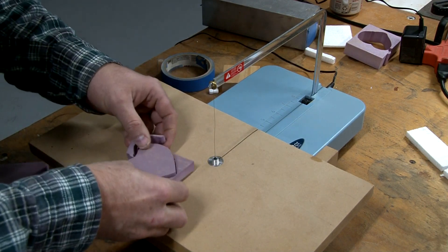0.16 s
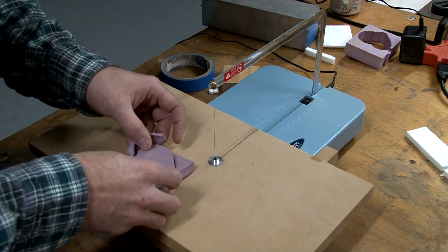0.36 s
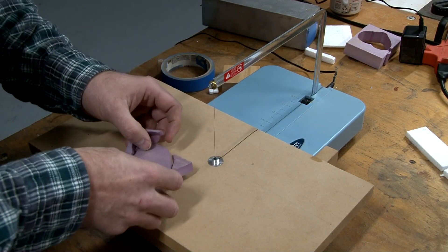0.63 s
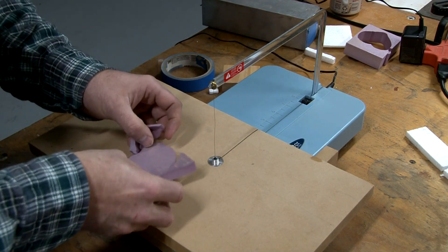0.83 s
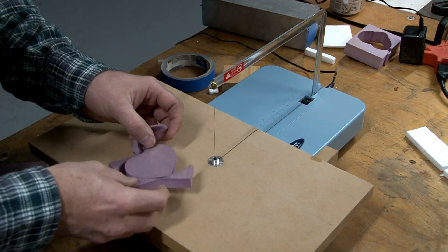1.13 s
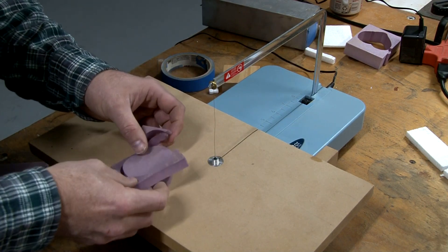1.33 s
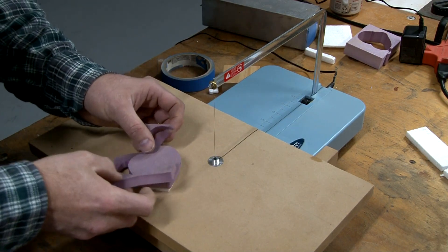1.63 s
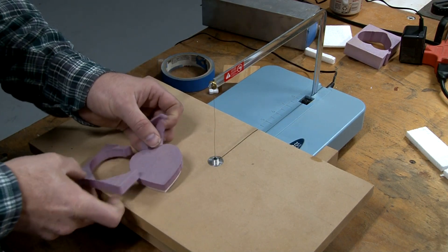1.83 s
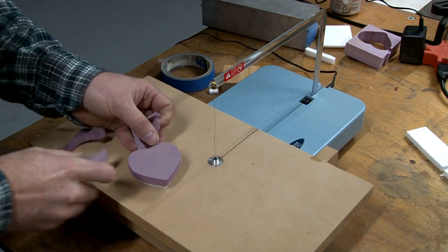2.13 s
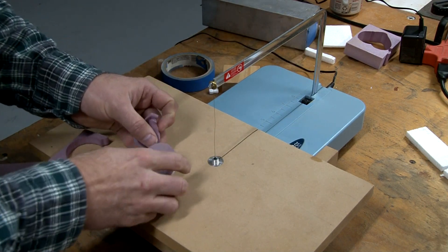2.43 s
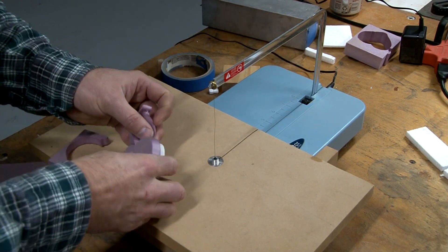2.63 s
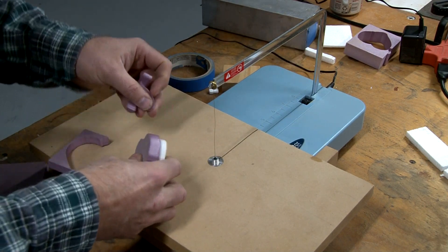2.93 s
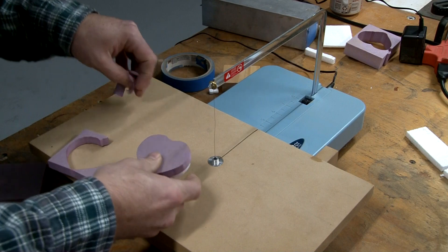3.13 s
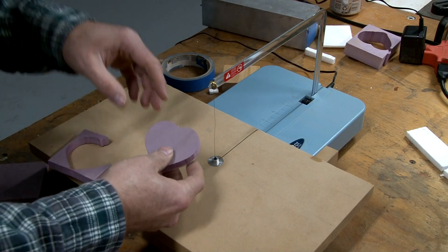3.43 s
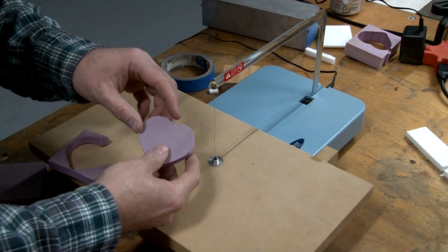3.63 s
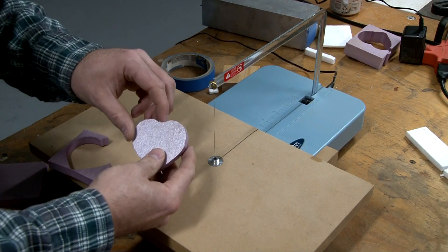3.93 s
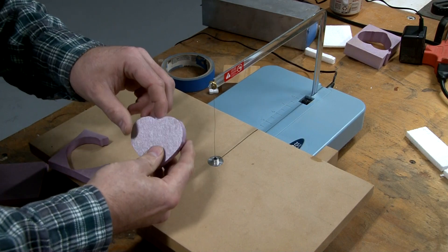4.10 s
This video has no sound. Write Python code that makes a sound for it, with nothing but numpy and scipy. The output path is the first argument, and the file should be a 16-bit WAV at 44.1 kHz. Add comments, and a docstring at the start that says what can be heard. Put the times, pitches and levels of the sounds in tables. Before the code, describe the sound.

Close, dry handling of rigid foam at a workshop bench, over very quiet steady air noise in a small room with short, sparse reflections. From the start, gritty, hollow, squeaky rubs come in short uneven strokes, with a sharp loud crack at 0.2 s and more crisp snaps around 0.75 s. Light hollow knocks on the board fall at 0.9, 1.2 and 1.3 s, amid firmer scrapes; another bright snap comes at 1.5 s, then a high brushing scrape and fingertip fizz until 1.9 s. Between 2.05 and 2.2 s cracks mix with a short thin metal ping. More snaps and rubs follow, with a dull bump and double crack near 2.75 s. A scrap hits sheet metal at 3.2 s, clattering brightly with rattle and ring around 3.4-3.5 s. As it fades, a crisp tick at 3.8 s, a firm scrape at 3.9 s and faint final touches remain.

```python
"""Cutting rigid foam by hand

A shape is worked out of a foam block on a workshop bench: uneven ticks scrape in strokes, fingertips fizz,
and caught edges snap loose as a slip and a crumble. Pieces knock on the board (noise puffs and modes),
thin metal pings and a tossed scrap clatters on sheet metal (modes over rattle).
Steady filtered noise lies beneath; sparse decaying reflections make a small room.
"""
import sys
import numpy as np
from scipy import signal
from scipy.fft import rfft, irfft
from scipy.io import wavfile

SR = 44100
rng = np.random.default_rng(int(sys.argv[2]) if len(sys.argv) > 2 else 0)


def dump_mix(stems):
    """Bounce the given channels to the path in sys.argv[1] as a 16-bit WAV at rate SR."""
    frames = np.atleast_2d(stems).T  # one column per channel
    limited = np.clip(frames, -1, 1)  # hard clip at full scale
    pcm = np.round(limited * 32767).astype(np.int16)
    wavfile.write(sys.argv[1], SR, pcm)


N = 188042
TIME_S = np.arange(N) / SR

# Workshop noise spectrum. Each row: frequency in Hz, relative level in dB.
AIR_SPECTRUM = [(15, -55), (35, -12), (70, -7.5), (110, 0), (170, -6), (285, -8), (416, 1), (680, -9),
                (1100, -5), (2000, -5.5), (3000, -9.5), (3600, -9.5), (6500, -7.5), (10000, -19),
                (16000, -42)]
AIR_DB = -65.5

# Room decay. Each row: frequency in Hz, t60 in seconds.
ROOM_DECAY = [(150, 0.2), (600, 0.47), (2000, 0.85), (6500, 0.46), (10000, 0.24), (15000, 0.024)]

# Scrap hitting sheet metal. Each row: start in seconds, level in dB, brightness in dB per octave
# about 3 kHz, loose rattle in dB against the hit level.
CLINKS = [(3.2147, -51.5, -1.5, -4.5), (3.3803, -46.5, 6.5, -1.5), (3.385, -48, 10.5, -11),
          (3.4945, -56, -3, 3), (3.503, -49, 2.5, -3)]
# Touches on the thin metal part. Each row: as for the clinks.
PINGS = [(2.0543, -51.5, 9, -13), (2.2015, -39, 7, -11.5)]
# Modes of the sheet metal. Each row: frequency in Hz, level in dB before brightness, t60 in seconds.
SHEET_METAL_MODES = [(420, -12, .4), (1045, -8, 0.35), (1440, -1.5, 0.94), (3034, -2, 0.77),
                     (3860, -10, 0.21), (4270, -24, .17), (5230, -6, 0.53), (6524, -7.5, .3),
                     (6504, -6.5, 0.52), (6900, -25, 0.33), (9050, -11, 0.12), (9220, -34, .5),
                     (9400, -33, 0.41)]
# Modes of the thin metal part. Each row: as for the sheet metal.
THIN_METAL_MODES = [(2475, 3, 0.097), (2490, -20, .4), (2570, -10, 0.24), (2850, -10, 0.29)]
# Spectrum of the loose rattle. Each row: frequency in Hz, relative level in dB.
RATTLE_SPECTRUM = [(200, -37), (500, -0.5), (1200, 2.5), (3000, 7.5), (4700, 0), (6500, -0.5), (8000, -4),
                   (9300, -8), (10500, -12), (16000, -42)]

# Soft bumps on the bench. Each row: start in seconds, level in dB.
BUMPS = [(1.877, -60), (2.762, -45.5)]
# Spectrum of a bench bump. Each row: frequency in Hz, relative level in dB.
BENCH_SPECTRUM = [(20, -41), (50, -7), (100, 0), (150, 0), (225, 0), (290, -9), (385, -2), (520, -12),
                  (2000, -59)]
# Pieces knocking on the board. Each row: start in seconds, level in dB, noise decay constant in seconds,
# gain of the board ring in dB.
KNOCKS = [(0.8807, -35.5, 0.0093, -67), (1.1805, -39.5, 0.01, -63), (1.297, -33.5, 0.001, -84),
          (2.0536, -49.5, 0.0079, -65.5), (2.2012, -49.5, 0.003, -76), (2.488, -52.5, 0.019, -58),
          (2.8193, -48, 0.0013, -91), (3.373, -39.5, 0.0073, -65), (3.383, -42.5, 0.0052, -81)]
# Spectrum of a knock. Each row: frequency in Hz, relative level in dB.
BOARD_SPECTRUM = [(30, -57), (120, -23), (280, -19), (430, -5), (700, -1.5), (1150, 6.5), (1800, -1.5),
                  (3000, -2.5), (8000, -22)]
# Modes of the board. Each row: frequency in Hz, relative level in dB, t60 in seconds.
BOARD_MODES = [(440, 6.2, 0.061), (595, 1.6, 0.3), (826, 1.5, 0.085), (1041, 3.7, 0.13)]

# Fingertips sliding over open cells. Each row: start in seconds, length in seconds, peak level in dB.
FINGER_SLIDES = [(0.072, .06, -49), (0.612, 0.025, -52), (1.69, 0.13, -52), (1.786, 0.14, -52.5),
                 (2.974, 0.081, -68), (3.082, 0.084, -53), (3.16, 0.024, -56.5)]

# Foam catching and letting go. Each row: start in seconds, ring level in dB, flex of the piece in dB
# against the ring, sharp edge in dB against the ring, crumble decay constant in seconds.
SNAPS = [(0.1006, -28.5, -3, -1, 0.0004), (0.2211, -10, -18, -17, 0.00065), (.347, -36, -3.5, -4, .001),
         (0.3593, -34.5, -6, -0.5, 0.0011), (0.6142, -35.5, -20, -1, 0.00065),
         (0.7192, -39, -17, -2, .0012), (0.7406, -26, -21, -16, 0.0043), (0.7705, -27, -20, -10, 0.0033),
         (.937, -35, 2.5, -1.5, 0.0011), (0.9447, -40, 12.5, -4, 0.00081), (0.9543, -32, 0, -11, 0.0024),
         (1.1182, -39, -14, -18, .0005), (1.3213, -31.5, -7, -6.5, 0.00096),
         (1.4627, -38.5, -0.5, -22, 0.00079), (1.488, -22.5, -7.5, -8.5, 0.00063),
         (1.8594, -31.5, -14, -6, .0008), (2.054, -30, -9, -6.5, 0.0019), (2.1162, -23, -8, -8.5, 0.0011),
         (2.161, -36.5, -3.5, -6, 0.0019), (2.2015, -30.5, 4, -11, 0.0011), (2.3342, -40, -4, -2.5, 0.0012),
         (2.4038, -26.5, -24, -2, .0016), (2.568, -43, 6.5, 4, 0.00099), (2.59, -39, 7.5, 4, 0.0017),
         (2.652, -39.5, 4, 1, 0.0026), (2.7484, -22, -9, -9.5, 0.0041), (2.7525, -24.5, -11, -3, 0.0011),
         (2.8229, -31.5, 1, -6, 0.001), (3.2147, -32.5, 2.5, -7.5, 0.0011), (3.231, -38.5, -37, -4, .0009),
         (3.7786, -25, -12, 0, 0.00084), (4.147, -44, 2, -11, 0.0011), (4.213, -42, -1, -10, 0.013)]
# Spectrum of the flexing piece. Each row: frequency in Hz, relative level in dB.
FLEX_SPECTRUM = [(50, -56), (300, -7), (1000, -14.5), (1800, -2.5), (2450, 14), (3400, 12.5), (4100, -37),
                 (4900, 14.5), (7000, -49)]
# Spectrum of the sharp edge and the fingertips. Each row: frequency in Hz, relative level in dB.
EDGE_SPECTRUM = [(500, -36), (4000, -28), (8500, 1), (11000, 7.5), (13000, 5), (16000, -3.5)]
# The more the piece flexes, the lower its ring.
SNAP_HZ, SNAP_HZ_PER_FLEX_DB = 6040, -34

# Light rubbing between strokes. Each row: time in seconds, level in dB before the grit and body shares.
LIGHT_RUB = [(0.0, -44), (.24, -53.5), (.5, -53), (.68, -55.5), (.8, -45), (1.0, -59.5), (1.2, -48.5),
             (1.42, -56.5), (1.68, -47), (1.96, -54.5), (2.15, -52), (2.29, -67), (2.43, -47.5),
             (2.55, -58.5), (2.76, -55), (2.93, -66), (3.55, -65), (4.26, -68)]
# Firm strokes. Each row: start in seconds, length in seconds, place of the peak from 0 to 1, grit level in dB,
# hollowness (body against grit) in dB, contact resonance in Hz.
STROKES = [(0.01, 0.1, 0.53, -46, -8, 2580), (0.155, 0.021, .4, -44.5, -4, 2500),
           (0.277, 0.0089, 0.7, -47, -4, 4500), (0.336, 0.08, 0.23, -47, -8, 5670),
           (0.43, 0.082, 0.26, -49.5, -2.5, 4900), (0.572, 0.059, 0.95, -51, -4, 5600),
           (0.727, 0.074, 0.17, -45, -1, 3780), (.855, .04, 0.68, -40, -4, 4110),
           (0.902, 0.17, .15, -56.5, 0.5, 1390), (1.18, 0.0091, 0, -41.5, 0.5, 2230),
           (1.212, 0.11, 0.41, -38.5, -6.5, 3820), (1.482, .13, 0.02, -47, -4.5, 4180),
           (1.61, 0.2, 0.85, -41.5, -12, 7000), (1.797, 0.13, 0.48, -48, -2.5, 6860),
           (2.339, 0.054, 1, -56.5, 4, 5640), (2.383, 0.041, 0.4, -40, -9, 4330),
           (2.576, 0.041, .7, -47, -8, 3920), (2.704, 0.063, 0.92, -45, -7, 6240),
           (2.98, 0.12, 0.16, -60, -17, 6260), (3.048, 0.082, 1, -49.5, -17.5, 2480),
           (3.72, 0.037, 1, -57, 1.5, 1550), (3.899, 0.081, 0.06, -35, -11, 1366),
           (3.962, 0.042, 0.5, -43.5, -4, 1190), (4.056, 0.064, 0.27, -55, -0.5, 5800)]
# Spectrum of the gritty scrape. Each row: frequency in Hz, relative level in dB.
GRIT_SPECTRUM = [(80, -77), (500, -55), (1200, -38.5), (1900, -20), (2500, -3), (3300, -17), (4100, -2.5),
                 (4800, -11.5), (5800, -3), (7000, -0.5), (7900, -6.5), (9700, -12.5), (10900, -8),
                 (13200, -19.5), (15000, -22)]
# Spectrum of the hollow body. Each row: frequency in Hz, relative level in dB.
BODY_SPECTRUM = [(60, -48), (250, -31.5), (430, -10.5), (750, -7), (1250, -1), (1900, -3), (2600, -2),
                 (3300, 4), (4000, -8), (4800, -4.5), (9000, -26.5)]
WALL_DB = 2.74  # foam wall under the contact, against the stroke's hollow body

# Microphone colour with a narrow dip. Each row: frequency in Hz, gain in dB.
MICROPHONE = [(3100, -1.5), (3480, -9), (3850, 1)]
# Stereo lean. Each row: frequency in Hz, left minus right in dB.
LEAN = [(100, 2.5), (280, 3.5), (550, 1.5), (1100, 0.1), (2200, 0.8), (4500, 1.9), (9000, 0)]
CUT_HZ = 16100


def amp(db):
    """Decibels to gain."""
    return 10 ** (np.asarray(db) / 20)


def unit(x):
    """Scales to rms 1."""
    return x / np.sqrt(np.mean(x ** 2) + 1e-20)


def read(points, hz):
    """Reads a table along a log-frequency axis."""
    f, value = np.transpose(points)
    return np.interp(np.log(hz + 1), np.log(f + 1), value)


def add(mix, s, sound):
    """Mixes a sound in at a time."""
    part = mix[max(round(s * SR), 0):][:len(sound)]
    part += sound[:len(part)]


def colour(x, spectrum, size=4096):
    """Causal filter with the given spectrum: it rings after a click, never before."""
    log_gain = np.log(amp(read(spectrum, abs(np.fft.fftfreq(size, 1 / SR)))))
    response = np.fft.ifft(np.exp(np.conj(signal.hilbert(log_gain)))).real
    return signal.fftconvolve(x, response[:size // 2])[:len(x)]


def wander(rate_hz):
    """Smooth chance of rms 1, rolled off above a rate."""
    hz = np.fft.rfftfreq(N, 1 / SR)
    return unit(irfft(rfft(rng.standard_normal(N)) / (1 + (hz / rate_hz) ** 2), N))


def burst(decay_s, size=4096):
    """A puff of noise that dies away."""
    return rng.standard_normal(size) * np.exp(-np.arange(size) / SR / decay_s)


def packed(x, length_s):
    """Scales a short sound to the energy of rms 1 held for a length."""
    return x / np.sqrt(np.sum(x ** 2) / (length_s * SR) + 1e-20)


def air(apart=0.63):
    """Steady workshop noise: a shared middle plus independent sides."""
    middle, left, right = (unit(colour(rng.standard_normal(N), AIR_SPECTRUM)) for _ in range(3))
    return amp(AIR_DB) * unit(middle + apart * np.array([left, right]))


def room(x, gap_s=0.0014, apart=0.93, order=12):
    """Sparse reflections of random sign for each side, each band dying at its own speed."""
    signs = rng.choice([-1., 1.], (2, SR))
    present = rng.random((2, SR)) < 1 / order
    taps = signs * present * (np.arange(SR) / SR > gap_s)
    # close-set microphones share most reflections
    taps = taps[0] + apart * np.array([[.7], [-.7]]) * taps[1]
    hz, t_s, bands = signal.stft(taps, SR, nperseg=256)
    decay = amp(-60 * t_s / read(ROOM_DECAY, hz)[:, None])
    tail = signal.istft(bands * decay, SR, nperseg=256)[1]
    return signal.fftconvolve(x[None], tail / np.linalg.norm(tail[0]), axes=1)[:, :N]


def metal(hits, modes, crash_db, crash_s, rattle_t60_s, contact_s, chatter_db=3, low_edge_hz=550):
    """Each hit rings the modes, loudest in the first moments, over an uneven rattle."""
    out, t_s = np.zeros(N), np.arange(SR) / SR
    press = 1 - np.exp(-t_s / contact_s)  # foam is a soft striker
    crash = (1 + amp(crash_db) * np.exp(-t_s / crash_s)) / 2
    for start_s, db, bright_db_per_octave, rattle_db in hits:
        ring = np.zeros(SR)
        for hz, mode_db, t60_s in modes:
            bright_db = bright_db_per_octave * np.log2(hz / 3000)
            ring += amp(mode_db + bright_db - 60 * t_s / t60_s) * np.sin(2 * np.pi * hz * t_s)
        chatter = rng.standard_normal(SR) * amp(chatter_db * wander(110)[:SR])
        rattle = unit(colour(chatter, RATTLE_SPECTRUM)) * amp(rattle_db - 60 * t_s / rattle_t60_s)
        add(out, start_s, amp(db) * press * (ring * crash + rattle))
    # the clinks and pings carry no low thump
    return signal.lfilter(*signal.butter(2, low_edge_hz, "high", fs=SR), out)


def knocks(bump_s=0.0025, rebound=0.2, rebound_s=0.0042):
    """Light hollow knocks ring the board; dull bumps push the bench and rebound once."""
    out, t_s = np.zeros(N), np.arange(SR // 2) / SR
    ring = sum(amp(db - 60 * t_s / t60_s) * np.sin(2 * np.pi * hz * t_s) for hz, db, t60_s in BOARD_MODES)
    for start_s, db, decay_s, ring_db in KNOCKS:
        knock = packed(colour(burst(decay_s), BOARD_SPECTRUM), decay_s)
        add(out, start_s, amp(db) * knock)
        add(out, start_s, amp(ring_db) * ring)
    thud = packed(colour(signal.unit_impulse(len(t_s)), BENCH_SPECTRUM), bump_s)
    for start_s, db in BUMPS:
        add(out, start_s, amp(db) * thud)
        add(out, start_s + rebound_s, amp(db) * rebound * thud)
    return out


def fingertips(uneven_db=4):
    """Dry skin ticks over the smallest cells: a thin, high fizz."""
    ticks = rng.standard_normal(N) * amp(uneven_db * rng.standard_normal(N))
    pressure = np.zeros(N)
    for start_s, length_s, db in FINGER_SLIDES:
        corners_s = [start_s, start_s + 0.37 * length_s, start_s + length_s]
        pressure += amp(db) * np.interp(TIME_S, corners_s, [0, 1, 0])
    return pressure * unit(colour(ticks, EDGE_SPECTRUM))


def snaps(level_s=0.00045, ring_width_hz=1800, crumble=0.33):
    """A caught edge lets go: a sharp slip and a crumble ring the foam briefly and flex the whole piece."""
    out = np.zeros(N)
    for start_s, db, flex_db, edge_db, crumble_s in SNAPS:
        hz = SNAP_HZ + SNAP_HZ_PER_FLEX_DB * flex_db
        slip = crumble * burst(crumble_s)
        slip[0] = 1
        t_s = np.arange(len(slip)) / SR
        resonance = t_s * np.exp(-np.pi * ring_width_hz * t_s) * np.sin(2 * np.pi * hz * t_s)
        ring = signal.fftconvolve(slip, resonance)[:len(t_s)]
        flex = colour(slip, FLEX_SPECTRUM)
        edge = colour(slip, EDGE_SPECTRUM)
        for part, share_db in ((ring, 0), (flex, flex_db), (edge, edge_db)):
            add(out, start_s, amp(db + share_db) * packed(part, level_s))
    return out


def rubbing(grit_db=-4, body_db=-5, grain_db=2.5, judder_db=3.0, swell=0.79, drift_db=1,
            wall_width_hz=450, wall_width_per_hz=0.068):
    """Foam cells catch one after another: dense uneven ticks, bunched by stick and slip, ring the pieces."""
    judder = amp(judder_db * wander(450))
    ticks = judder * rng.standard_normal((3, N)) * amp(grain_db * rng.standard_normal((3, N)))
    light_db = np.interp(TIME_S, *np.transpose(LIGHT_RUB))
    power = amp([light_db + grit_db, light_db + body_db]) ** 2  # rows: grit, body
    out = np.zeros(N)
    for start_s, length_s, peak, db, hollow_db, hz in STROKES:
        span = slice(round(start_s * SR), round((start_s + length_s) * SR))
        progress = np.linspace(0, 1, len(TIME_S[span]))
        push = np.interp(progress, [0, np.clip(peak, .02, .97), 1], [0, 1, 0]) ** swell
        power[:, span] += (amp([db, db + hollow_db])[:, None] * push) ** 2
        # the foam wall under the contact has its own resonance, different with every grip
        width_hz = wall_width_hz + wall_width_per_hz * hz
        band_hz = [max(hz - width_hz / 2, 100), hz + width_hz / 2]
        wall_filter = signal.butter(2, band_hz, "band", fs=SR)
        wall = unit(signal.lfilter(*wall_filter, ticks[2, span]))
        add(out, start_s, amp(db + hollow_db + WALL_DB) * push * wall)
    for force, drive, spectrum in zip(np.sqrt(power), ticks, (GRIT_SPECTRUM, BODY_SPECTRUM)):
        drift = amp(drift_db * wander(62))
        out += force * unit(colour(drive, spectrum) * drift)
    return out


def scene():
    """The foam is close; the sheet metal is farther off and more of the room is heard with it."""
    clink = metal(CLINKS, SHEET_METAL_MODES, crash_db=17, crash_s=0.0045, rattle_t60_s=0.5, contact_s=0.00013)
    ping = metal(PINGS, THIN_METAL_MODES, crash_db=13.5, crash_s=0.017, rattle_t60_s=0.41, contact_s=0.00089)
    knock = knocks()
    snap = snaps()
    rub = fingertips() + rubbing()
    sent = amp(-9.0) * clink + amp(-10.5) * ping + amp(-8) * knock + amp(-14.5) * snap + amp(-12) * rub
    return air() + room(sent) + clink + ping + knock + snap + rub


def record(dry):
    """The microphone colours the sound and leans it a little left; then the band limit."""
    hz = np.fft.rfftfreq(N, 1 / SR)
    lean_db = read(LEAN, hz)
    gain_db = read(MICROPHONE, hz) + np.array([lean_db, -lean_db]) / 2
    heard = irfft(rfft(dry) * amp(gain_db), N)
    low_pass = signal.firwin(255, CUT_HZ, window=("kaiser", 9), fs=SR)
    return signal.oaconvolve(heard, low_pass[None], "same")


dry = scene()
out = record(dry)
dump_mix(out)
```